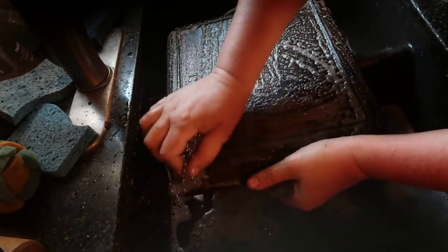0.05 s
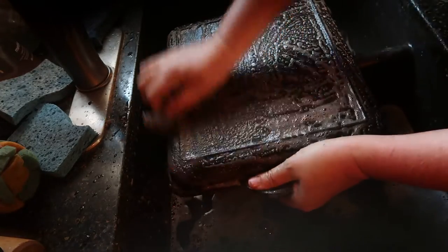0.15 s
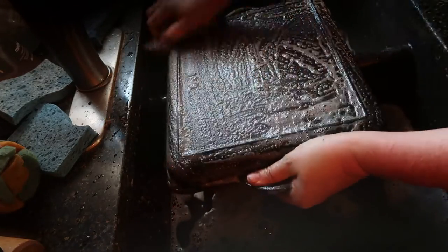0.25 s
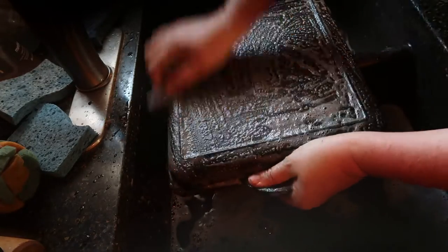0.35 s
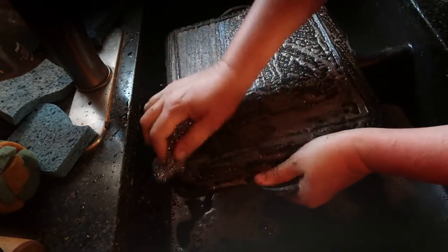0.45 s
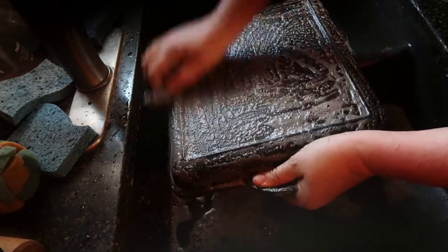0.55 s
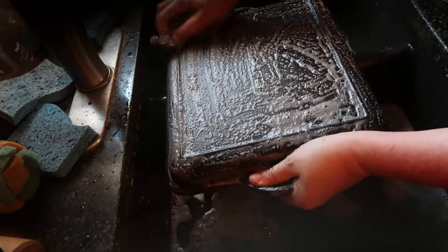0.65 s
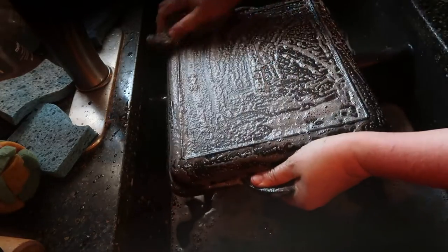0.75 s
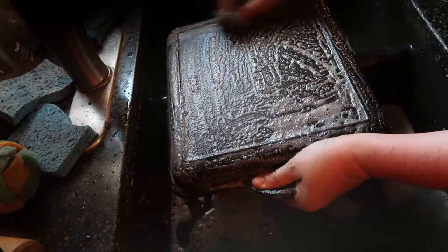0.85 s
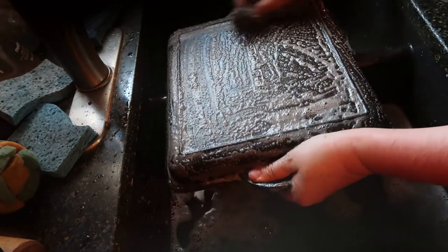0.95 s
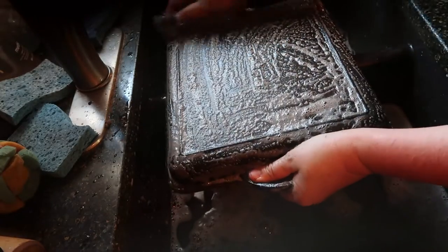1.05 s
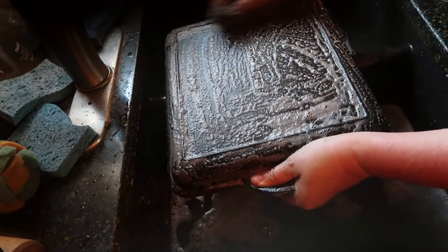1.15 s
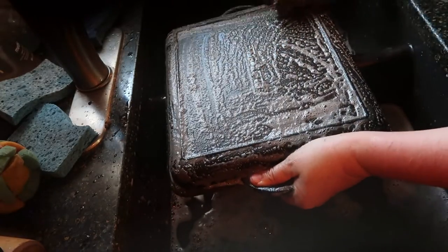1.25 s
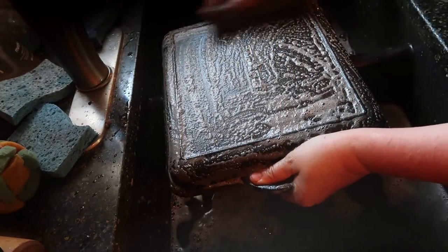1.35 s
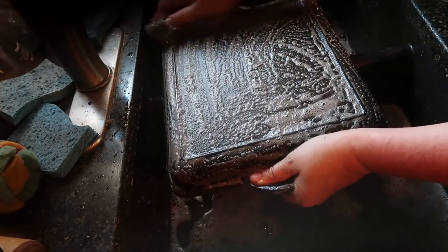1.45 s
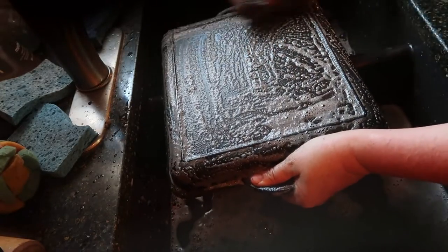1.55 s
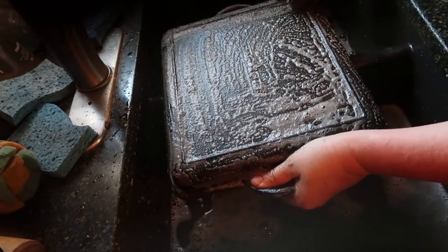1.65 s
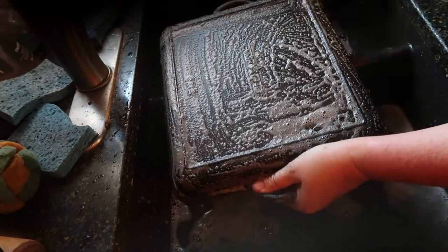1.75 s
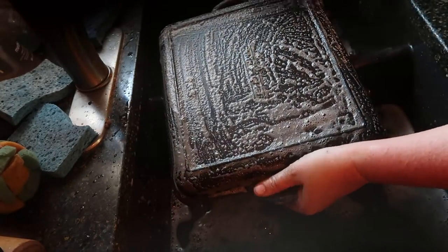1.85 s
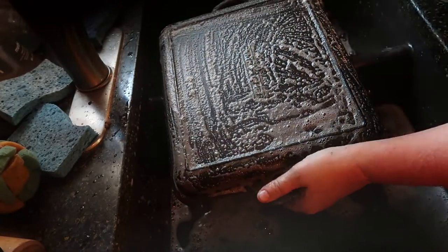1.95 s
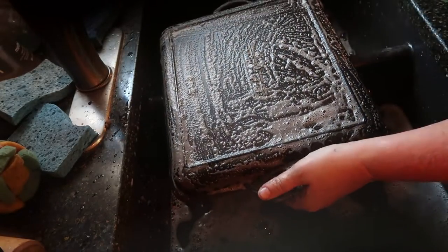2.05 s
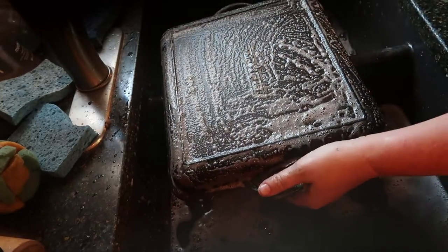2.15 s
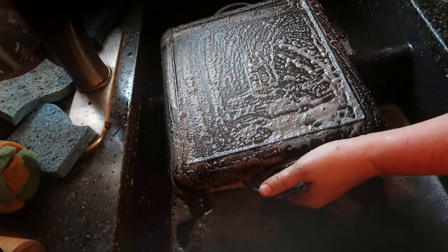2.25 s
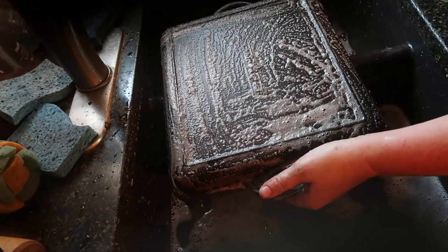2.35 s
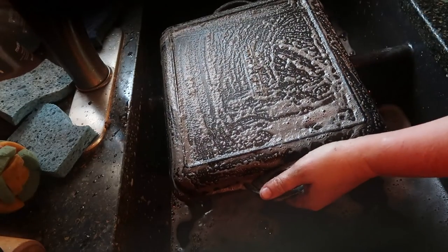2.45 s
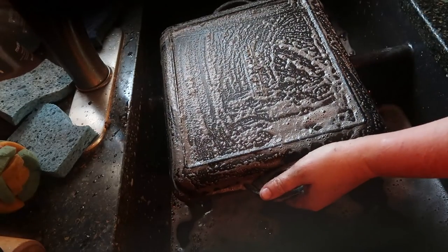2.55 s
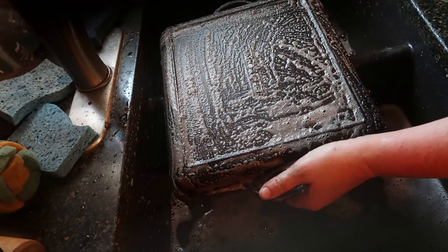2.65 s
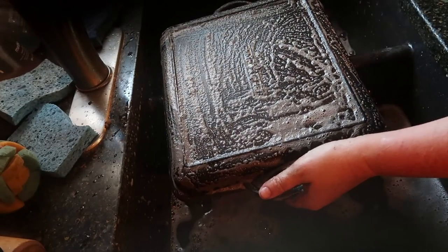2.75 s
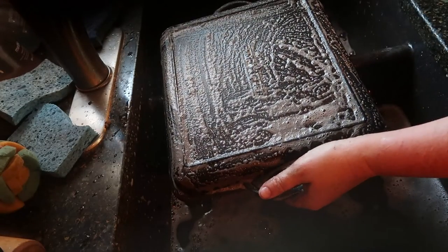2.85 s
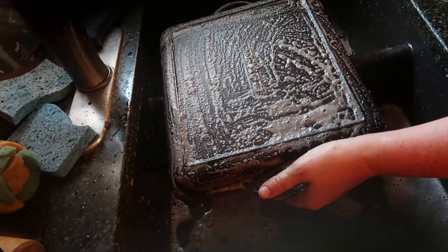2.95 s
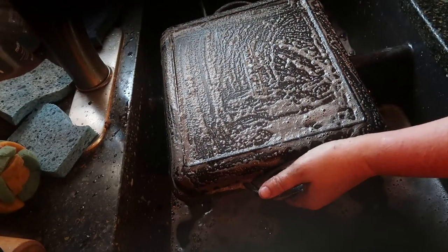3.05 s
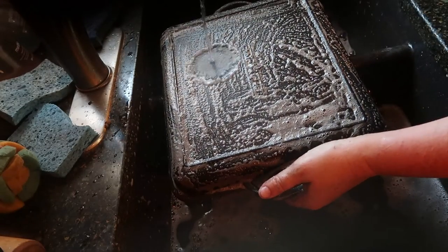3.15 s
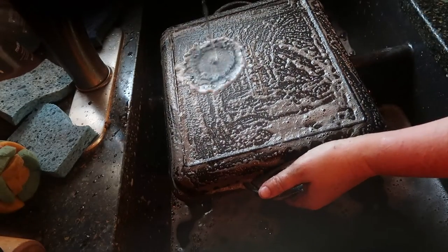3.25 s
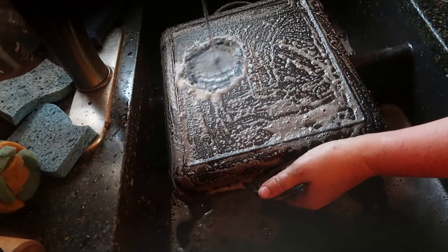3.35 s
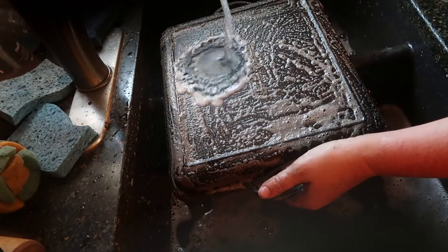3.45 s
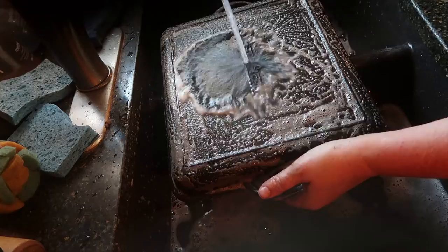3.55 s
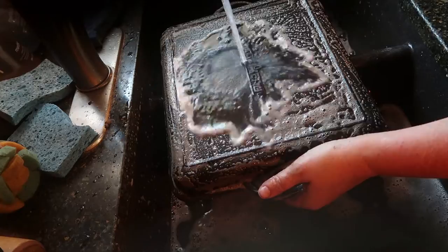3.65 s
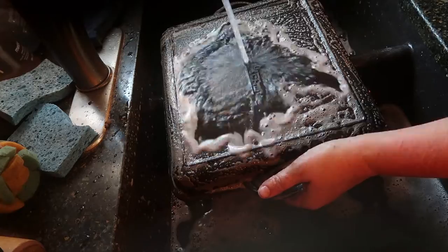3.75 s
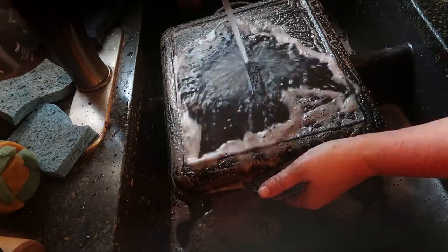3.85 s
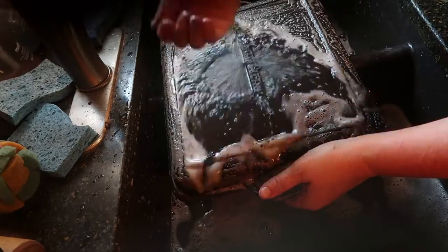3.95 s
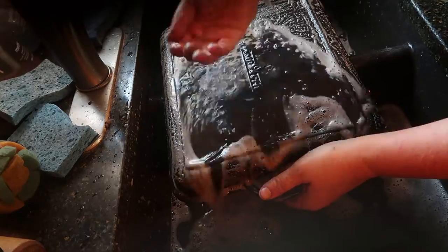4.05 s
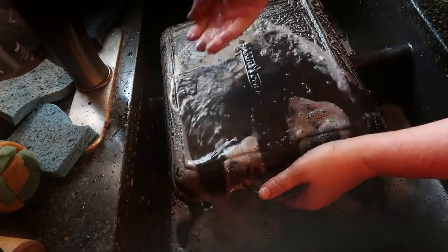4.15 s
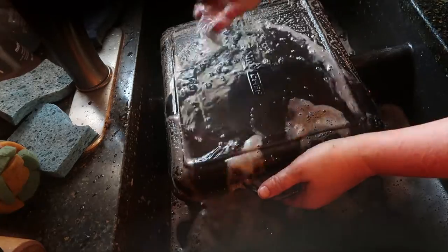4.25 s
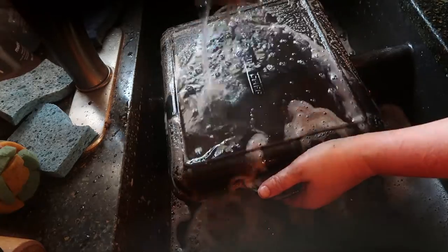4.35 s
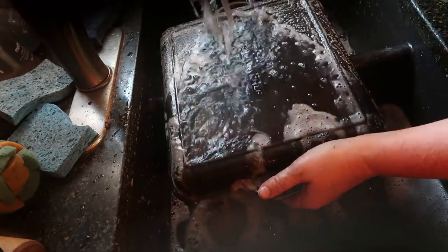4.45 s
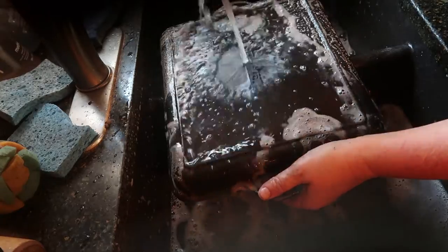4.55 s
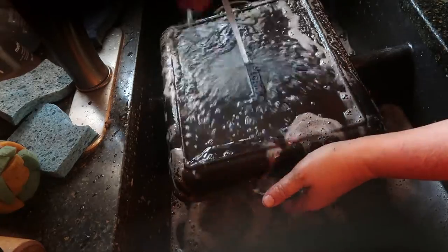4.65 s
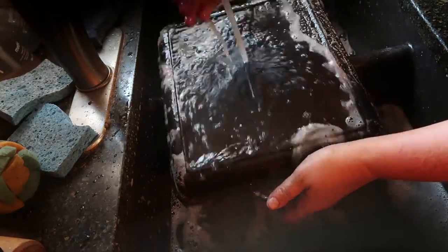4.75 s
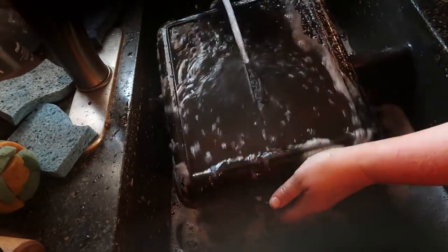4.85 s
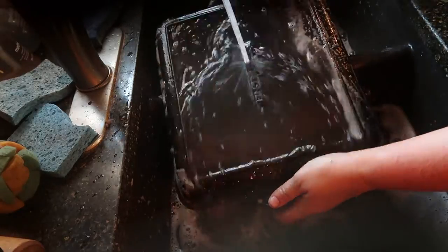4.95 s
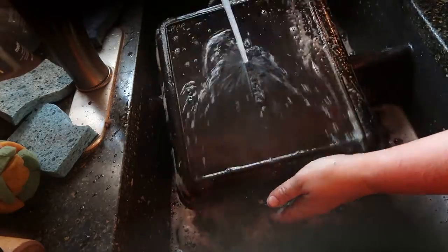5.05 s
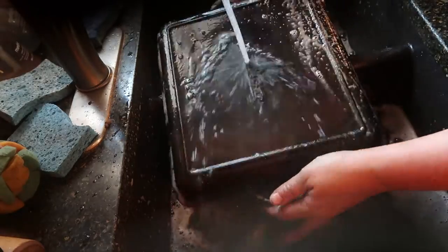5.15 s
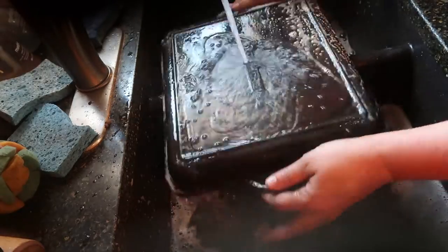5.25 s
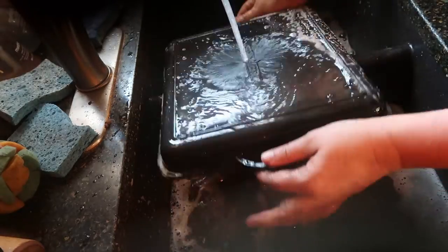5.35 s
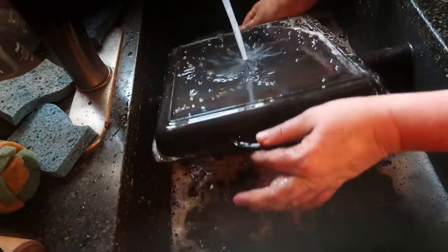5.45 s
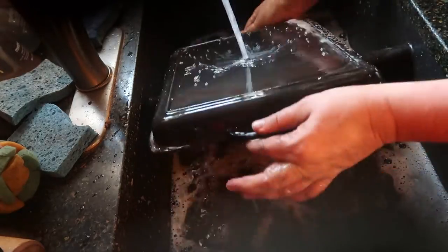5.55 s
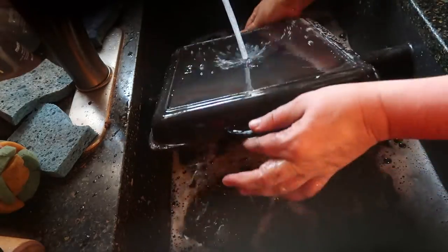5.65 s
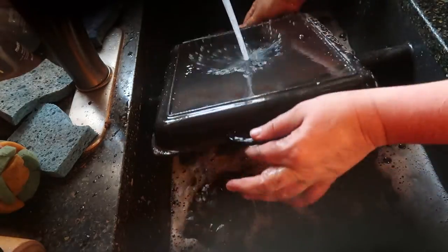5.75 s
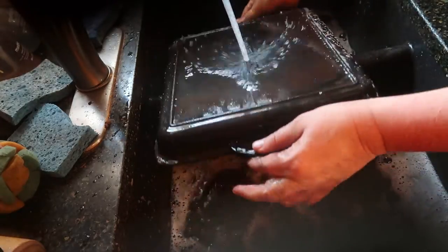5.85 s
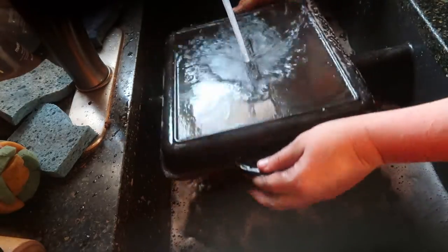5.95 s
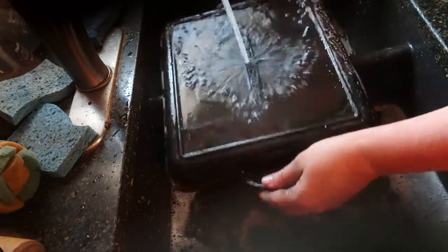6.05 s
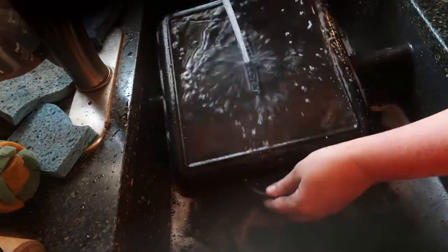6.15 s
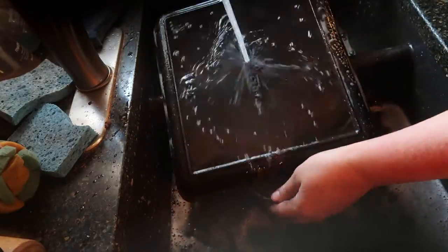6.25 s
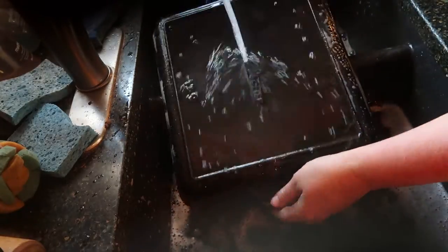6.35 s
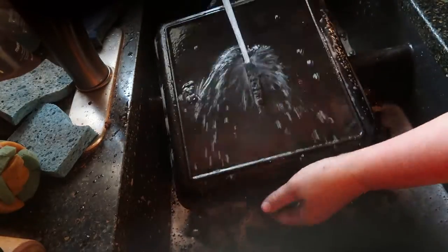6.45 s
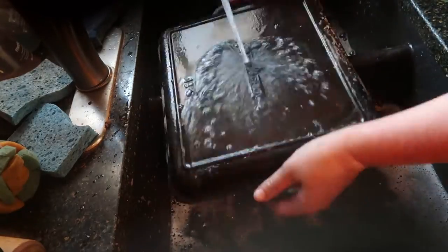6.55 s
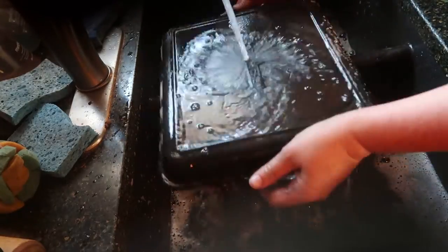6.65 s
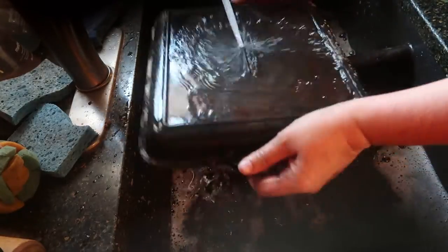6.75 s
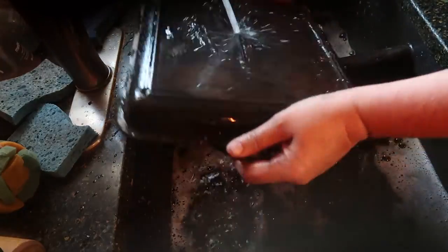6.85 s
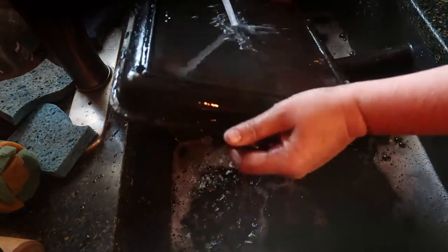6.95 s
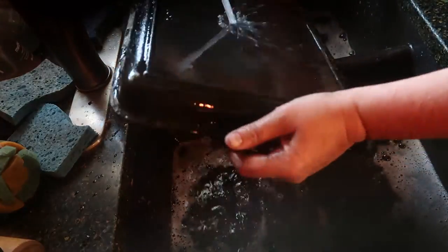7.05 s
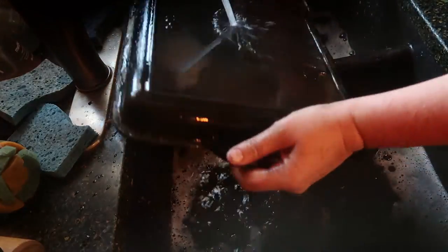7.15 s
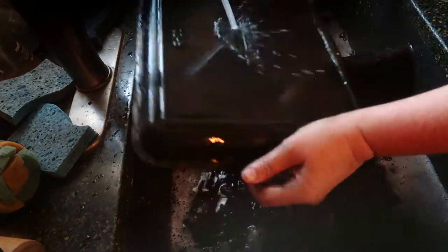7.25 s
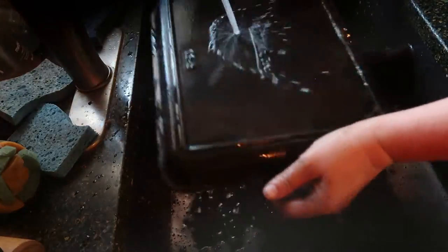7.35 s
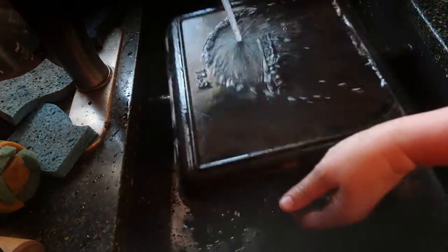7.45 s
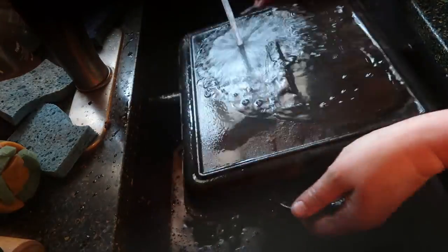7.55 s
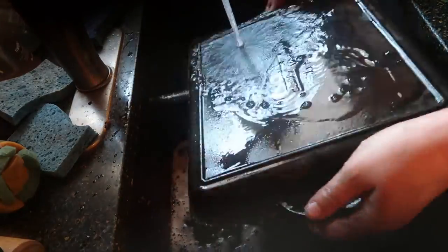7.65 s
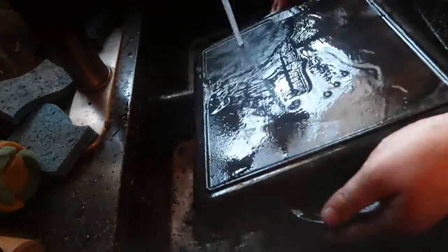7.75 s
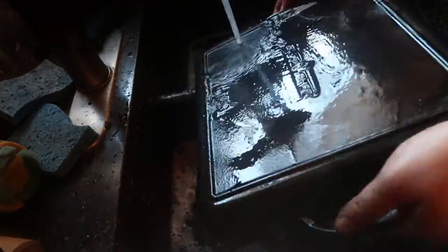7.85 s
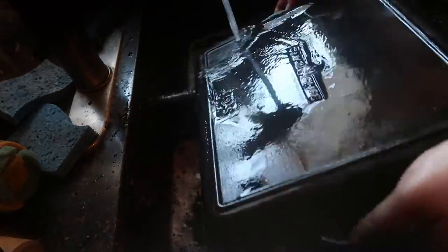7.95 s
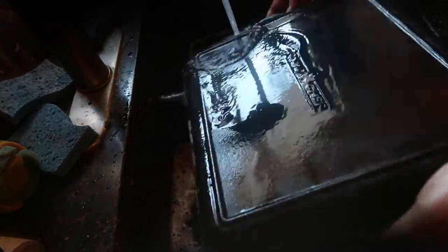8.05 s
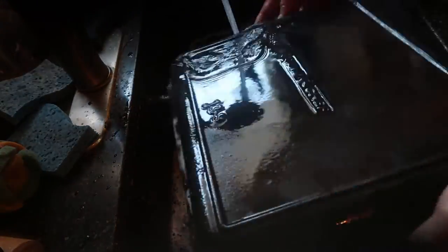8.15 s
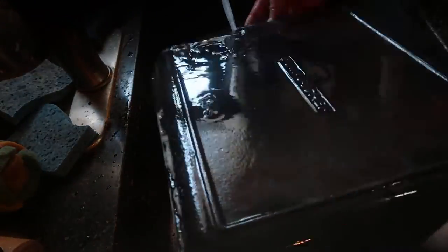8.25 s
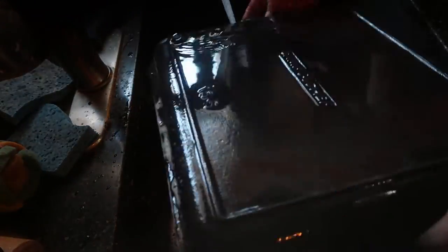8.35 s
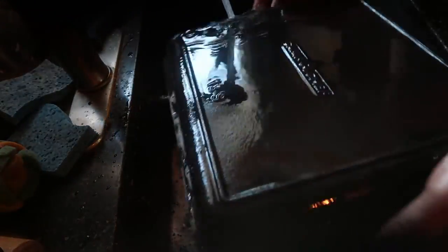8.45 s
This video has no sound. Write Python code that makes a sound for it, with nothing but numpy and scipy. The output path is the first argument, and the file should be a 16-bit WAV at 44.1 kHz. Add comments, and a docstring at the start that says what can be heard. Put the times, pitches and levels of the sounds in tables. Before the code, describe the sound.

Close up at a kitchen sink, stiff bristles scrub a wet iron griddle in quick back-and-forth strokes, the heavy plate juddering on the basin. The brush clatters down, a tap handle creaks, and water starts spattering on the iron. Run-off splashes and bubbles below while the griddle is tipped, thudding hard on the basin, scraping and briefly groaning.

```python
"""A wet cast iron griddle is scrubbed in a kitchen sink, juddering against the basin under the strokes.
Random bristle flicks are filtered into rasp, hiss and ring. The brush is put down with a clatter.
The tap creaks in stick-slip and starts to run onto the iron; water is random drops and ringing bubbles.
The griddle is dragged, tipped and bumped, exciting the resonances of plate and basin.
A close, narrow microphone pair hears it; the hardest bump makes the recorder's limiter duck."""
import sys
import numpy as np
from scipy import signal
from scipy.fft import rfft, irfft, next_fast_len
from scipy.io import wavfile
from scipy.ndimage import uniform_filter1d

SR = 44100
rng = np.random.default_rng(int(sys.argv[2]) if len(sys.argv) > 2 else 0)


def dump_mix(stems):
    """Bounce the given channels to the path in sys.argv[1] as a 16-bit WAV at rate SR."""
    frames = np.atleast_2d(stems).T  # one column per channel
    limited = np.clip(frames, -1, 1)  # hard clip at full scale
    pcm = np.round(limited * 32767).astype(np.int16)
    wavfile.write(sys.argv[1], SR, pcm)


N = 374485

# resonances of the iron plate: f/Hz, width/Hz, level/dB
IRON_MODES = [(428, 20, -6), (608, 22, -4), (846, 12, -2), (1394, 20, -1), (1527, 24, -1), (1760, 60, 0),
              (1915, 60, 0), (2060, 45, -4), (2385, 40, -1), (3582, 34, -1), (3890, 55, -3), (4330, 45, -7),
              (4612, 40, 1), (4970, 45, -7), (5305, 40, -3), (6310, 45, -9), (6550, 45, -10),
              (7417, 45, -10), (8070, 50, -6), (8585, 45, -10), (9625, 45, -11)]
# resonances of the basin's walls: f/Hz, width/Hz, level/dB
BASIN_MODES = [(140, 30, 0), (180, 34, 1), (240, 36, 2), (300, 45, -4), (410, 55, -4), (620, 100, -8.5),
               (735, 80, -15.5)]


def hand(turn_s=0.029):
    """Each stroke speeds up and slows down in one arch: gains of rasp, hiss and hollow, and speed 0 to 1."""
    # brush strokes, back and forth: start t/s, end t/s, then level/dB of
    # rasp (pressure), bristle hiss (speed) and ring of the hollow
    strokes = [(-.025, 0.149, -35, -35.5, -33), (0.144, .374, -32.5, -30.5, -31),
               (0.364, 0.549, -29, -29, -28.5), (0.549, 0.734, -31.5, -30.5, -31),
               (0.71, 0.826, -47, -47, -47.5), (0.816, 1.01, -34, -33, -35), (0.995, 1.167, -33, -34, -34),
               (1.138, 1.34, -35, -32.5, -34.5), (1.333, 1.544, -30.5, -32, -31),
               (1.519, 1.75, -34, -32.5, -35.5), (1.673, 1.883, -42, -40.5, -53)]
    t = np.arange(N) / SR
    out = np.zeros((4, N))
    for start, end, rasp_db, hiss_db, hollow_db in strokes:
        during = (t > start) & (t < end)
        along = (t[during] - start) / (end - start)
        arch = 4 * along * (1 - along)
        out[:, during] += np.outer(from_db([rasp_db, hiss_db, hollow_db, 0]), arch)
    return np.abs(uniform_filter1d(out, size=int(turn_s * SR), axis=1))   # the turns are rounded


def scrubbing(iron_db=-5, flutter_db=1.4, shift_db=2.5, catch_db=1.5, wobble_hz=110,
              hollow_hz=1850, climb_hz_per_s=240, sag_hz=400):
    """Bristles flick over the rough iron; pressure gives the rasp, speed the hiss, and the plate rings along."""
    # colour of the rasp: f/Hz, level/dB
    rasp_colour = [(150, -3.5), (400, -3), (900, 0), (1100, -1), (1450, -8), (1900, 1), (2400, -3.5),
                   (3200, -8), (4500, -1.5), (7000, -38), (15000, -41)]
    # colour of the bristle hiss: f/Hz, level/dB
    bristle_colour = [(1000, -24.5), (2500, 7), (4300, -2), (6000, -0.5), (8000, -2.5), (11000, -6.5),
                      (14000, -6.5), (16000, -16)]
    pressure, speed, ring, pace = hand()

    flicks = grains(per_s=6000, spread_db=1.0) * from_db(flutter_db * drift(120))
    rasp = patchy(coloured(flicks, rasp_colour), rate=44, depth_db=shift_db)

    # the hollow under the hand climbs as the scrubbing goes on and sags with speed
    pitch = hollow_hz + climb_hz_per_s * np.arange(N) / SR - sag_hz * pace + wobble_hz * drift(25.35)
    hollow_flicks = coloured(grains(per_s=4000, spread_db=3.0), band_around(hollow_hz))
    hollow = moving_resonance(hollow_flicks, pitch, width_hz=670)

    hiss = rms_one(coloured(grains(per_s=10000, spread_db=0.5), bristle_colour))
    plate = wandering(grains(per_s=7900, spread_db=5.5), IRON_MODES, rate=9.5, depth_db=0.5)
    # pressed hard, tufts catch and let go together
    catches = from_db(catch_db * pressure / pressure.max() * drift(260))
    return catches * (pressure * (rasp + from_db(iron_db) * plate) + ring * hollow + speed * hiss)


def slide_level(judder_db=-10.0, release_s=0.14):
    """Each slide catches, holds and dies away; the brush's pressure also keeps the rim juddering."""
    # the griddle's rim sliding on the basin: start t/s, end t/s, level/dB at start,
    # level/dB at end, time to catch t/s (rising 40 dB)
    slides = [(0.008, 0.124, -28, -23.5, 0.097), (0.438, 0.485, -24, -26, 0.018),
              (0.549, 0.595, -26, -24, 0.05), (0.707, 0.767, -42, -34.5, .067),
              (1.115, 1.151, -41, -30, .067), (1.387, 1.417, -25, -25, 0.14),
              (4.884, 4.958, -38.5, -40, 0.02), (5.62, 5.876, -33.5, -26, 0.053),
              (6.32, 6.567, -35, -20.5, 0.16), (6.797, 6.868, -22, -14, 0.023),
              (6.89, 7.022, -19.5, -20, 0.046), (7.262, 7.275, -24, -27, 0.036)]
    level = from_db(judder_db) * hand()[0]
    for start, end, first_db, last_db, catch_s in slides:
        curve = [(start - catch_s, first_db - 40), (start, first_db),
                 (end, last_db), (end + release_s, last_db - 40)]
        level = level + gains(curve)[0]
    return level


def sliding(iron_db=-13, grit_db=-21.0):
    """The rim sticks and slips unevenly; every slip shakes the basin and the plate."""
    slips = grains(per_s=700, spread_db=1.5)
    shake = evened(resonate(slips, BASIN_MODES), window_s=.02)

    # pressed on the basin, the plate rings shorter
    pressed_plate = [(hz, width * 1.5, db) for hz, width, db in IRON_MODES]
    plate_colour = [(430, -32), (900, 0.0), (1400, 5.0), (2400, 3), (3700, 3.5), (4600, -4.0), (8000, -7)]
    plate = coloured(wandering(slips, pressed_plate, rate=27, depth_db=4.5), plate_colour)
    plate = evened(plate, window_s=0.016)

    grit = rms_one(coloured(slips, [(300, 28), (800, -21), (2000, 11), (3200, 18), (6000, -11)]))
    return slide_level() * (shake + from_db(iron_db) * plate + from_db(grit_db) * grit)


def squeals(edge_db=19, rough_db=4.0):
    """Friction locks onto one mode for a moment, unsteady in pitch and strength."""
    # brief stick-slip squeals of the tap and the iron: start t/s, loudest t/s, end t/s,
    # f/Hz, level/dB, pitch wobble (share)
    squeal_rows = [(3.29, 3.39, 3.5, 3585, -42, .003), (6.77, 6.85, 7.05, 1400, -29, .006),
                   (6.86, 6.98, 7.09, 846, -23, .009), (6.8, 6.98, 7.1, 2400, -37, .008),
                   (6.82, 6.885, 6.92, 3590, -31.5, .005), (6.94, 6.975, 7.08, 3575, -32, .005),
                   (6.85, 6.94, 7.07, 415, -15.5, .04), (6.8, 6.96, 7.06, 630, -17, .05)]
    out = 0
    for start, top, end, hz, db, wobble in squeal_rows:
        level, = gains([(start, db - edge_db), (top, db), (end, db - edge_db)])
        turns = np.cumsum(hz * (1 + wobble * drift(90))) / SR
        out = out + level * from_db(rough_db * drift(100)) * np.sin(2 * np.pi * turns)
    return out


def bumps(low_hz=90):
    """The heavy plate lands softly on the basin and damps the walls as it rests on them."""
    # the griddle bumping the basin: t/s, peak level/dB, contact time/ms, damping (factor on mode widths)
    bump_rows = [(0.03, -9.5, 5, 1), (0.059, -14, 1.2, 1.1), (0.561, -10, 3.8, 0.47), (0.574, -34, 2, 1.5),
                 (5.843, -1, 4.2, 9.8), (5.849, -6, 2.7, 0.64), (5.8571, -15.5, 3.7, 0.91),
                 (6.5305, 0.5, 2, 19), (6.535, 13, 1.5, 4.8), (6.802, -13.5, 0.49, 3.7),
                 (6.84, -8, 0.33, 5.1), (6.889, -9, 0.48, 3.7), (6.912, -11, 1.1, 5.6),
                 (6.98, -7, 0.74, 5.4), (7.256, -24, 6, 7.7)]
    out = np.zeros(N)
    t = np.arange(SR // 4) / SR
    radiation = signal.butter(2, low_hz, "high", fs=SR, output="sos")   # small walls radiate little bass
    for s, db, contact_ms, damping in bump_rows:
        phase = np.minimum(t / (contact_ms / 1000), 1)
        push = np.sin(np.pi * phase) ** 2
        damped_walls = [(hz, width * damping, level) for hz, width, level in BASIN_MODES]
        thud = signal.sosfilt(radiation, resonate(push, damped_walls))
        add(out, s, from_db(db) * thud / np.abs(thud).max())
    return out


def knocks(snap_db=6, snap_t60=0.0064, crack_t60=0.13, tail_db=-24, tail_t60=0.92, ring_db=-22):
    """The brush clatters down: a crack, the counter's modes and a faint tail; each contact has its brightness."""
    # the brush put down beside the sink: t/s, level/dB, brightness f/Hz
    contacts = [(1.977, -29, 9100), (1.993, -11.5, 10000), (2.0, -12.5, 7060), (2.0405, -5.5, 3200),
                (2.046, -5.5, 1000), (2.108, -1, 2290), (2.115, -12, 1000), (2.126, -14.5, 7050),
                (2.149, -10, 1200)]
    # modes of the counter: f/Hz, level/dB, t60 t/s
    counter = [(258, -3, 0.13), (296, 3, 0.078), (485, -5, .06), (571, 6.5, 0.075), (646, 4, .1),
               (700, 1.5, 0.2), (1116, -3, 0.083), (1400, 3, .07), (1460, -2, 0.079), (1580, -5, 0.18),
               (1637, 2, 0.055), (1800, -17.5, 0.52), (1980, -2, 0.06), (2390, -21, 0.48),
               (2760, -16, 0.38)]
    # colour of the crack: f/Hz, level/dB
    crack_colour = [(100, -16), (280, 7), (400, 8), (630, 18), (900, 1), (1250, 8), (1600, 8), (2000, 12),
                    (2300, 6), (2800, 8), (5000, 1.5), (9000, -5), (16000, 6)]
    out = np.zeros(N)
    for s, db, bright_hz in contacts:
        noise = from_db(snap_db) * burst(snap_t60) + burst(crack_t60) + from_db(tail_db) * burst(tail_t60)
        crack = coloured(noise, crack_colour)
        t = np.arange(len(crack)) / SR
        modes = 0
        for hz, level, t60 in counter:
            strength = from_db(level + rng.normal(0, 1.0)) * rng.choice([-1, 1])
            modes = modes + strength * np.sin(2 * np.pi * hz * t) * fade(t60, .5)
        blow = crack / np.abs(crack).max() + from_db(ring_db) * modes
        treble_cut = signal.butter(3, min(bright_hz, SR / 3), fs=SR, output="sos")
        add(out, s, from_db(db) * signal.sosfilt(treble_cut, blow))
    # the knocks carry no bass
    return signal.sosfilt(signal.butter(3, 230, "high", fs=SR, output="sos"), out)


def swishes(width_hz=260):
    """Faint gliding bands of noise: a ringing tail after the knocks, then soft swishes."""
    # the gliding bands: start t/s, loudest t/s, end t/s, f/Hz at start, f/Hz at end, level/dB
    glides = [(2.15, 2.288, 2.4, 2010, 1650, -52.5), (2.14, 2.29, 2.34, 2860, 2550, -52.5),
              (2.14, 2.22, 2.34, 4970, 4540, -58), (2.683, 2.82, 3.3, 2180, 2600, -57),
              (2.95, 3.036, 3.35, 2860, 3300, -55.5), (3.127, 3.183, 3.24, 1380, 1250, -50)]
    out = np.zeros(N)
    clicks = grains(per_s=5800, spread_db=6.0)
    for start, top, end, first_hz, last_hz, db in glides:
        t = np.arange(int(start * SR), int(end * SR))
        crackle = coloured(clicks[t], band_around(first_hz))
        swish = moving_resonance(crackle, np.linspace(first_hz, last_hz, len(t)), width_hz)
        swell_db = np.interp(t / SR, [start, top, end], [-8, 0, -12])
        add(out, start, swish * from_db(db + swell_db))
    return out


def tap(tick_t60=0.031, slips_per_s=178, jitter=0.22, release_s=0.054):
    """The handle clicks, then creaks and rubs through the tap's hollow body."""
    # the stiff handle rubbing as it is worked: start t/s, end t/s, level/dB at start, level/dB at end
    turns = [(2.471, 2.6, -32.5, -55), (2.566, 2.62, -39.5, -34), (2.863, 2.986, -30, -36),
             (3.36, 3.457, -29, -36)]
    # resonances of the tap's body: f/Hz, width/Hz, level/dB
    tap_body = [(100, 26, -3), (284, 30, 5), (523, 110, 4), (646, 110, 7.5), (780, 59, 1.5), (1070, 59, 1),
                (1390, 49, -21), (1660, 59, -34), (2380, 140, -35), (2900, 110, -25), (3800, 240, -42),
                (4400, 220, -35), (5600, 200, -31), (8000, 540, -48), (11600, 1900, -38)]
    # clicks of the tap and first drops on the iron: t/s, peak level/dB, centre f/Hz
    ticks = [(2.471, -23.5, 3560), (2.615, -38, 5470), (2.861, -23, 4550), (2.989, -28.5, 1990),
             (3.05, -30.5, 2150), (3.25, -28, 4670), (3.313, -29, 7350), (3.342, -23.5, 5030),
             (3.361, -20.5, 5170), (3.385, -27, 8000), (3.453, -24, 9000), (8.411, -18, 6000)]
    level = 0
    for start, end, first_db, last_db in turns:
        level = level + gains([(start, first_db), (end, last_db), (end + release_s, last_db - 29)])[0]
    creak = rms_one(stick_slip(slips_per_s, jitter))
    rub = rms_one(grains(per_s=4200, spread_db=1.5))
    out = level * evened(wandering(creak + rub, tap_body, rate=43, depth_db=8.0), window_s=0.015)
    for s, db, hz in ticks:
        tick = coloured(burst(tick_t60), band_around(hz))
        add(out, s, from_db(db) * tick / np.abs(tick).max())
    return out


def stick_slip(per_s, jitter):
    """Nearly regular slips of a tight joint."""
    cycles = np.floor(np.cumsum(per_s * np.exp(jitter * drift(per_s))) / SR)
    return np.diff(cycles, prepend=0)


def water(clump_db=0.68, patch_db=2.5, spatter_db=-1, drops_db=-7, fizz_db=-6, spray_db=-10, iron_db=-9,
          gurgle_db=-5.5, smear_db=3):
    """The stream breaks into droplets and tiny bubbles on the iron; the run-off splashes and gurgles below."""
    # how hard the stream hits the iron, as the hand crosses it and the griddle tips: t/s, level/dB
    stream_curve = [(3.38, -51), (3.46, -40), (3.56, -43), (3.69, -38), (4.02, -37.5), (4.15, -47),
                    (4.28, -36.5), (4.43, -42.5), (4.55, -36), (4.76, -39), (4.9, -36), (6.5, -39.5),
                    (6.6, -36.5), (7.1, -43.5), (7.4, -38.5), (8.49, -37)]
    # water running off into the basin: t/s, level/dB
    runoff_curve = [(3.3, -56), (3.4, -50), (4.05, -43.5), (4.45, -40.5), (4.7, -43.5), (4.8, -50),
                    (4.95, -44.5), (5.4, -41), (7.05, -42.5), (7.6, -42), (8.49, -40.5)]
    # colour of droplets on the iron: f/Hz, level/dB
    spatter_colour = [(300, 4), (1000, -3.5), (2000, 3.5), (3000, 10), (4400, 6), (5600, 8.5), (8000, 6),
                      (11000, 4), (13500, 2), (16000, -20)]
    # colour of fat drops: f/Hz, level/dB
    drop_colour = [(500, -9), (2000, -14), (4400, 3), (8000, 1.5), (13000, -3), (16000, -6)]
    # colour of the splash in the basin: f/Hz, level/dB
    splash_colour = [(90, -7), (150, -8), (330, -0.5), (450, -6), (650, 9), (950, 0), (1400, 4.5),
                     (2000, 1.5), (3000, 5), (5000, -23), (12000, -12.5)]
    stream = gains(stream_curve)[0] * from_db(0.5 * drift(8.9))   # wavers
    runoff = gains(runoff_curve)[0] * from_db(0.5 * drift(13))   # gushes
    clumps = from_db(clump_db * drift(90))

    spatter = coloured(grains(per_s=12000, spread_db=0.5) * clumps, spatter_colour)
    spatter = patchy(spatter, rate=70, depth_db=patch_db)
    smear = shifting_echoes(spatter, t60=0.015, delay=.001, rate=60, count=3)   # the film softens each drop
    # the colour shifts as the jet travels
    spatter = patchy(smear * from_db(smear_db) + spatter, rate=5, depth_db=2.36)

    fizz = bubble_cloud(low_hz=3800, high_hz=5000, per_s=390, cycles=20, spread_db=4.5)
    spray = bubble_cloud(low_hz=6000, high_hz=14900, per_s=220, cycles=34, spread_db=2.5)
    # droplets are too light for the lowest modes
    plate = rms_one(resonate(grains(per_s=3100, spread_db=-1.0), IRON_MODES[3:]))

    splash = coloured(grains(per_s=4000, spread_db=4.0) * clumps, splash_colour)
    splash = patchy(splash, rate=43, depth_db=patch_db)
    gurgle = bubble_cloud(low_hz=1100, high_hz=2766, per_s=150, cycles=47, spread_db=4.5)

    # single fat drops stand out of the hiss, each bursting into a small spray
    drops = rms_one(coloured(grains(per_s=170, spread_db=1.5) * clumps, drop_colour))
    drops = shifting_echoes(drops, t60=0.032, delay=.0005, rate=30, count=2)

    on_iron = from_db(drops_db) * drops + from_db(spatter_db) * spatter + from_db(fizz_db) * fizz
    on_iron = on_iron + from_db(spray_db) * spray + from_db(iron_db) * plate
    return stream * on_iron + runoff * (splash + from_db(gurgle_db) * gurgle)


def bubble_cloud(low_hz, high_hz, per_s, cycles, spread_db):
    """Bubbles of random pitch ring for some cycles, the higher ones for a shorter time; unit power."""
    pitches = np.geomspace(low_hz, high_hz, num=24)
    births = grains(per_s, spread_db)
    dealt = rng.integers(0, len(pitches), N)   # which pitch each birth gets
    out = 0
    for k, hz in enumerate(pitches):
        # a wider resonance starts louder: dividing by hz evens the peaks
        out = out + resonate(births * (dealt == k) + 1e-18, [(hz, 2 * hz / cycles, 0)]) / hz
    return rms_one(out)


def film(width_hz=170, upper_ratio=2.13, upper_width_hz=600, upper_db=1):
    """The jet's patter rings in the spreading film, in a low and a high band, until the iron is covered."""
    # the film of water round the jet: t/s, f/Hz, level/dB
    film_curve = [(3.42, 2100, -60), (3.52, 2020, -47), (3.75, 1980, -50.5), (4.03, 1940, -52),
                  (4.16, 1970, -60), (4.35, 2700, -53), (4.7, 1850, -46), (5.0, 1690, -62)]
    s, hz, db = np.transpose(film_curve)
    level, = gains(np.c_[s, db])
    pitch = np.interp(np.arange(N) / SR, s, hz)
    low = moving_resonance(grains(per_s=3600, spread_db=2.0), pitch, width_hz)
    high = moving_resonance(grains(per_s=600, spread_db=3.5), upper_ratio * pitch, upper_width_hz)
    return level * (low + from_db(upper_db) * high)


def slaps():
    """A sheet of water slaps into the basin and breaks into a short shower of drops."""
    # sheets of water: t/s, length t/s, level/dB, centre f/Hz
    sheets = [(3.826, 0.03, -49.5, 3220), (5.217, 0.028, -30.5, 2600), (6.457, 0.025, -29, 1890),
              (7.25, 0.038, -38, 2200), (4.45, 0.21, -48, 563), (7.693, 0.057, -35, 1590),
              (7.99, 0.031, -30.5, 2300), (8.202, 0.099, -29.5, 2210)]
    out = np.zeros(N)
    drops = grains(per_s=3200, spread_db=2.5)
    for s, length, db, hz in sheets:
        shower = rms_one(coloured(drops[int(s * SR):int((s + length) * SR)], band_around(hz)))
        age = np.linspace(0, 1, len(shower))
        add(out, s, from_db(db) * shower * np.sin(np.pi * np.sqrt(age)))
    return out


def gulps(contact_t60=0.029, scatter=0.035, grit_db=-15, gap_at_s=6.7, rise_per_s=0.036):
    """Each dollop lands with a push and a short splatter; the gap rings, tuned anew as the water shifts."""
    # dollops of run-off dropping into the gap under the griddle: t/s, peak level/dB, brightness f/Hz
    dollops = [(4.286, -35, 1300), (4.35, -31, 900), (4.388, -36, 900), (4.428, -31, 800), (4.48, -24, 700),
               (4.53, -25.5, 650), (4.578, -32, 650), (4.612, -33, 650), (4.644, -30, 1500),
               (5.222, -23.5, 2000), (5.265, -26, 1400), (5.319, -25, 1300), (5.435, -42, 1600),
               (5.545, -37, 1800), (5.958, -26, 800), (6.213, -22.5, 800), (7.215, -29, 700),
               (7.335, -23, 800), (7.45, -26.5, 795), (7.587, -22, 1400), (7.638, -28, 1500),
               (7.706, -29, 1400), (8.01, -23, 1200), (8.141, -21, 1000), (8.2, -17.5, 1500),
               (8.228, -26, 1800), (8.252, -21, 1800), (8.296, -24, 1000), (8.454, -25, 1100)]
    # resonances of the air in that gap at gap_at_s: f/Hz, width/Hz, level/dB
    gap_air = [(650, 64, 3), (1060, 84, 0.5), (1410, 160, -3.5), (1650, 110, -12), (2250, 190, 2)]
    out = np.zeros(N)
    for s, db, bright_hz in dollops:
        push = from_db(grit_db) * burst(contact_t60)[:SR // 8]
        push[0] += 1
        # the gap narrows as the sink fills, so its pitches rise
        detune = np.exp(rise_per_s * (s - gap_at_s) + scatter * rng.standard_normal(len(gap_air)))
        tuned = [(hz * shift, width, level) for (hz, width, level), shift in zip(gap_air, detune)]
        ring = resonate(push, tuned)
        ring = signal.sosfilt(signal.butter(2, bright_hz, fs=SR, output="sos"), ring)
        add(out, s, from_db(db) * ring / np.abs(ring).max())
    return out


def plops(brood_db=-12, scatter=0.2, brood_s=.03, brood_cycles=20,
          splash_db=-7, splash_t60=0.065, splash_ratio=2.0):
    """Each bubble comes with a small splash and a brood of fainter ones just around it."""
    # the loudest bubbles and bright spits: t/s, peak level/dB, f/Hz, cycles to fall 60 dB
    loud_bubbles = [(3.716, -24, 3950, 50), (4.254, -27.5, 1310, 18), (4.349, -28, 2690, 50),
                    (4.644, -35, 1940, 45), (4.793, -24.5, 4460, 50), (5.01, -25.5, 1590, 33),
                    (5.082, -33, 1260, 27), (5.607, -25, 4140, 56), (6.248, -21.5, 3840, 50),
                    (6.363, -20, 4320, 30), (5.318, -26.5, 1360, 38), (5.379, -32, 2010, 30),
                    (5.408, -24.5, 1980, 40), (5.52, -29, 1260, 40), (5.542, -27, 1400, 40),
                    (5.615, -27, 2440, 45), (5.632, -26, 1350, 35), (5.657, -29, 1290, 35),
                    (5.816, -22.5, 2090, 11), (5.958, -23, 2530, 50), (5.983, -21, 1720, 33),
                    (6.007, -17.5, 1576, 39), (6.023, -33, 1130, 44), (6.134, -23.5, 1810, 14),
                    (6.153, -32, 1310, 25), (6.257, -26, 1293, 140), (7.123, -32, 1920, 70),
                    (7.321, -27.5, 580, 19), (7.346, -22, 716, 41), (7.55, -26, 1400, 12),
                    (7.87, -33, 1250, 26), (7.403, -24.5, 736, 59), (7.497, -26.5, 2370, 62),
                    (7.515, -29, 1590, 89), (7.637, -23.5, 1350, 33), (7.733, -14, 2510, 40),
                    (7.92, -28, 1860, 89), (8.068, -30, 1640, 40), (8.101, -21, 1830, 15),
                    (8.202, -14.5, 682, 29), (8.206, -19.5, 1640, 55), (8.294, -23.5, 960, 24),
                    (8.341, -26.5, 984, 89), (8.436, -24, 1800, 40)]
    out = np.zeros(N)
    for s, db, hz, cycles in list(loud_bubbles) + pool_bubbles():
        add(out, s, from_db(db) * bubble(hz, cycles))
        splash = coloured(burst(splash_t60)[:SR // 10], band_around(hz * splash_ratio))
        add(out, s, from_db(db + splash_db) * splash / np.abs(splash).max())
        detunes = np.clip(rng.normal(0.087, scatter, size=5), -.2, .6)
        for detune, lag in zip(detunes, rng.uniform(-0.24, 1, size=5)):
            add(out, s + lag * brood_s, from_db(db + brood_db) * bubble(hz * np.exp(detune), brood_cycles))
    return out


def pool_bubbles(count=80, from_s=4.9, first_db=-36.5, slope_db_per_s=-0.27, spread_db=3.5,
                 centre_hz=1400, spread_octaves=0.575, cycles=57):
    """Chance bubbles once water pools, slowly growing fainter, as rows (s, peak dB, Hz, cycles)."""
    times = from_s + (N / SR - from_s) * (np.arange(count) + rng.random(count)) / count
    chances = np.clip(rng.standard_normal((count, 2)), -2, 2)
    rows = []
    for s, (strength, height) in zip(times, chances):
        db = first_db + slope_db_per_s * (s - from_s) + spread_db * strength
        rows.append((s, db, centre_hz * 2 ** (spread_octaves * height), cycles))
    return rows


def bubble(hz, cycles, rise=0.035, swell_cycles=0.92):
    """One bubble swells, rings and rises a little in pitch as it nears the surface; peak 1."""
    decay = fade(cycles / hz, .1)
    turns = np.cumsum(hz * (1 + rise * (.5 - decay))) / SR
    tone = np.sin(2 * np.pi * turns) * decay * (1 - np.exp(-turns / swell_cycles))
    return tone / np.abs(tone).max()


def background(air_db=-47, hum_db=-51, hum_hz=57.4, waver_db=-2.0):
    """Still kitchen air, as coloured noise, with a wavering appliance hum."""
    # colour of the quiet kitchen: f/Hz, level/dB
    air_colour = [(20, -14), (45, -40), (80, -6), (150, 3.5), (240, -9), (450, -4.5), (700, -11),
                  (1200, -18.5), (3000, -26), (8000, -30), (15000, -44)]
    hum = np.sqrt(2) * np.sin(2 * np.pi * hum_hz * np.arange(N) / SR) * from_db(waver_db * drift(13))
    air = rms_one(coloured(rng.standard_normal(N), air_colour))
    return from_db(air_db) * air + from_db(hum_db) * hum


def from_db(db):
    """Decibels to gain."""
    return 10 ** (np.asarray(db) / 20)


def rms_one(x):
    """Scale to unit power."""
    return x / np.sqrt(np.mean(x ** 2) + 1e-20)


def evened(x, window_s):
    """Hold the short-term power at one."""
    return x / np.sqrt(np.abs(uniform_filter1d(x ** 2, size=int(window_s * SR))) + 1e-12)


def gains(rows):
    """Each dB column of a curve as a gain per sample, practically silent outside the curve."""
    s, *columns = np.transpose(rows)
    return [from_db(np.interp(np.arange(N) / SR, s, c, left=-120, right=-120)) for c in columns]


def add(out, s, sound):
    """Mix a short sound in at time s."""
    at = max(int(s * SR), 0)
    out[at:at + len(sound)] += sound[:max(N - at, 0)]


def drift(rate):
    """Chance with unit power, in straight lines between about rate random values a second."""
    knots = rng.standard_normal(int(N / SR * rate) + 2)
    return rms_one(np.interp(np.arange(N) / SR * rate, np.arange(len(knots)), knots))


def grains(per_s, spread_db):
    """Random clicks of uneven size and sign."""
    sizes = from_db(spread_db * np.minimum(rng.exponential(1, N), 4)) * rng.choice([-1, 1], N)
    return sizes * (rng.random(N) < per_s / SR) + 1e-18


def fade(t60, length):
    """Exponential decay over length seconds."""
    return from_db(-60 * np.arange(int(length * SR)) / SR / t60)


def burst(t60):
    """Half a second of noise dying away."""
    decay = fade(t60, .5)
    return rng.standard_normal(len(decay)) * decay


def band_around(hz):
    """A broad hump of spectrum with steep skirts."""
    return [(hz / 5, -26), (hz / 3.1, -4), (hz, 0), (hz * 1.82, -5), (hz * 2.7, -24)]


def coloured(x, spectrum):
    """Causal (minimum phase) filter that follows (Hz, dB) points."""
    size = 2 * next_fast_len(len(x) // 2 + 2048)
    hz, db = np.transpose(spectrum)
    curve = np.interp(np.log(np.fft.rfftfreq(size, 1 / SR) + 1), np.log(hz), db)
    # folding the cepstrum onto positive time gives the minimum phase
    cepstrum = irfft(np.log(from_db(curve)))
    cepstrum[1:size // 2] *= 2
    cepstrum[size // 2 + 1:] = 0
    return irfft(rfft(x, size) * np.exp(rfft(cepstrum)))[:len(x)]


def patchy(x, rate, depth_db):
    """Each region of the spectrum swells and fades by itself; unit power."""
    centres = np.log([300, 700, 1300, 2100, 3200, 4700, 7500, 13000])
    size = next_fast_len(N)
    pitch = np.log(np.fft.rfftfreq(size, 1 / SR) + 1)
    spectrum = rfft(x, size)
    out = 0
    for share in np.eye(len(centres)):
        band = irfft(spectrum * np.interp(pitch, centres, share), size)[:N]
        out = out + band * from_db(depth_db * drift(rate))
    return rms_one(out)


def resonate(x, modes):
    """Parallel resonances of (Hz, width, dB), signs alternating."""
    out = 0
    for k, (hz, width, db) in enumerate(modes):
        r = np.exp(-np.pi * width / SR)
        poles = [1, -2 * r * np.cos(2 * np.pi * hz / SR), r * r]
        gain = (-1) ** k * from_db(db) * (1 - r * r) / 2
        out = out + gain * signal.lfilter([1, 0, -1], poles, x)
    return out


def wandering(x, modes, rate, depth_db):
    """As the contact point travels, each mode is fed more or less strongly; unit power."""
    return rms_one(sum(resonate(x * from_db(depth_db * drift(rate)), [mode]) for mode in modes))


def moving_resonance(x, hz, width_hz):
    """A resonance whose centre follows hz sample by sample; unit power."""
    turn = np.exp(2j * np.pi * np.cumsum(hz) / SR)
    r = np.exp(-np.pi * width_hz / SR)
    return rms_one((signal.lfilter([1 - r], [1, -r], x / turn) * turn).real)


def echoes(x, t60, delay):
    """A dense train of reflections with unit energy."""
    tail = np.r_[np.zeros(int(delay * SR)), burst(t60)]
    return signal.fftconvolve(x, tail / np.linalg.norm(tail))[:N]


def shifting_echoes(x, t60, delay, rate, count=5):
    """Reflections that keep changing as the hands and the griddle move."""
    shares = np.array([drift(rate) for _ in range(count)])
    return sum(share * echoes(x, t60, delay) for share in shares / np.linalg.norm(shares, axis=0))


def limited(x, limit_db=2, attack_s=0.0012, recovery_db_per_s=15):
    """A peak over the limit pulls the gain down almost at once; it creeps back afterwards."""
    over = np.maximum(20 * np.log10(np.abs(x).max(axis=0) + 1e-9) - limit_db, 0)
    recovered = recovery_db_per_s * np.arange(N) / SR
    cut = np.maximum.accumulate(over + recovered) - recovered
    return x * from_db(-uniform_filter1d(cut, size=int(attack_s * SR)))


def scene(basin_db=-8, room_db=-17, plop_echo_db=-7):
    """Everything sounds in the basin, close to a narrow microphone pair, with a little kitchen behind."""
    # how much the two sides differ for the sounds in the sink: f/Hz, side level/dB
    sink_width = [(60, -42), (200, -33), (400, -27), (1000, -22), (2500, -20.5), (3000, -11), (4500, -6.5),
                  (6300, -6.5), (8500, -13), (13000, -12)]
    # dry contacts throw their treble wider than the water does: f/Hz, extra side level/dB
    dry_width = [(200, 0), (1000, 1), (2400, 3.5), (3100, 1), (4500, -0.5), (7000, 2.5), (14000, 4.5)]
    # the diffuse air differs more: f/Hz, side level/dB
    air_width = [(60, -36), (110, -53), (200, -11.5), (380, -9), (700, -9), (1300, -6), (4400, 1.5),
                 (8000, -12), (15000, -7)]
    bubbles = plops()
    # they burst deep under the plate
    under_plate = shifting_echoes(bubbles, t60=0.028, delay=0.003055, rate=9.8)
    bubbles = bubbles + from_db(plop_echo_db) * under_plate
    contacts = knocks() + tap() + gulps() + bubbles + slaps() + swishes()
    body = sliding() + bumps() + squeals()
    bright = scrubbing() + water() + film() + contacts

    basin = from_db(basin_db) * shifting_echoes(bright, t60=0.043, delay=0.0022, rate=4)
    room = from_db(room_db) * echoes(bright + body, t60=0.38, delay=0.0072)
    mid = bright + body + basin + room + background()

    # bristles and droplets are spread wide, so each side hears its own share of them
    dry_spread = scrubbing() + echoes(contacts + body, t60=0.016, delay=0)
    spread = water() + coloured(dry_spread, dry_width)
    side = coloured(spread, sink_width) + coloured(background(), air_width)
    return np.array([mid + side, mid - side])


def record(dry, cutoff_hz=15650):
    """The limiter ducks after the hardest bump, the loudest peaks are rounded and the top is cut."""
    held = limited(dry)
    rounded = held / (1 + (held / .97) ** 6) ** (1 / 6)
    return signal.sosfilt(signal.ellip(12, .1, 90, cutoff_hz, fs=SR, output="sos"), rounded)


dry = scene()
out = record(dry)
dump_mix(out)
```